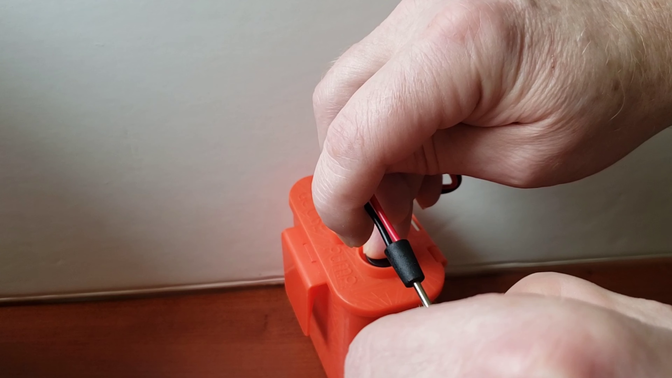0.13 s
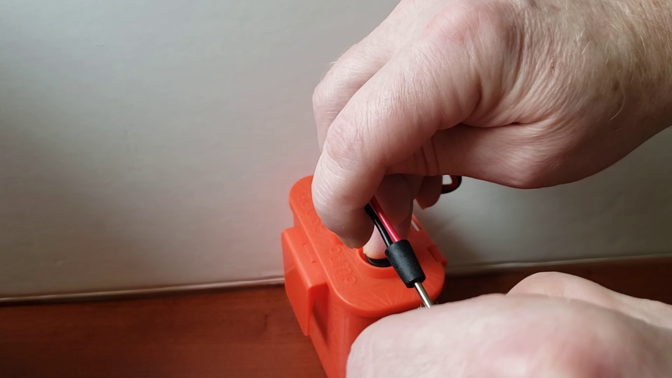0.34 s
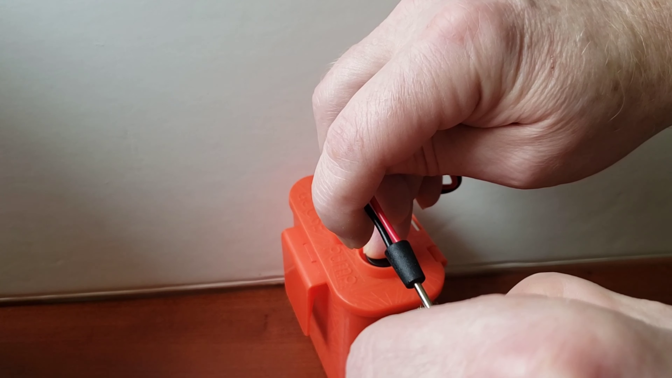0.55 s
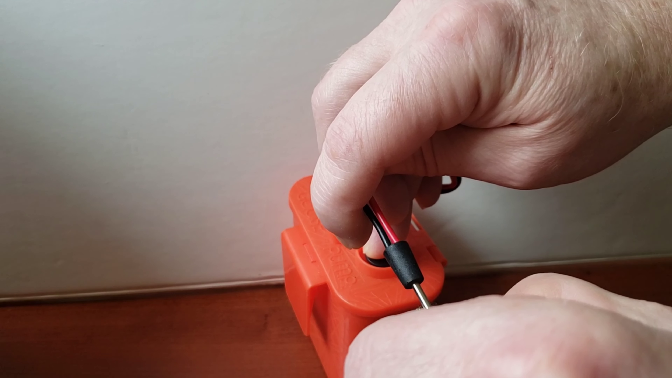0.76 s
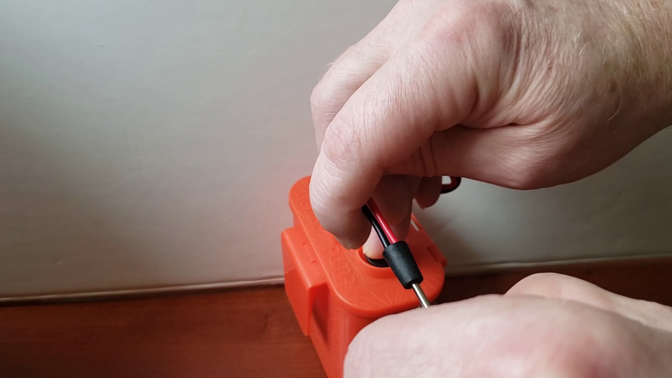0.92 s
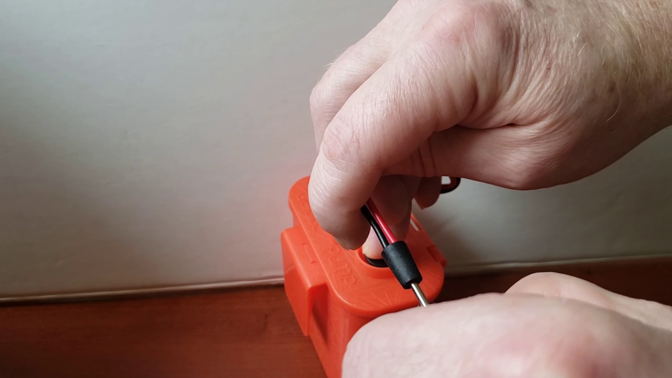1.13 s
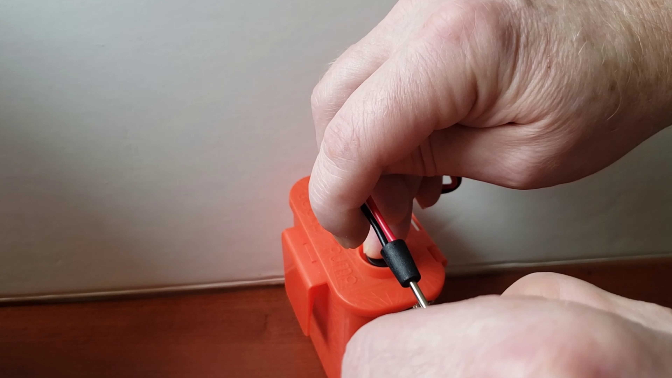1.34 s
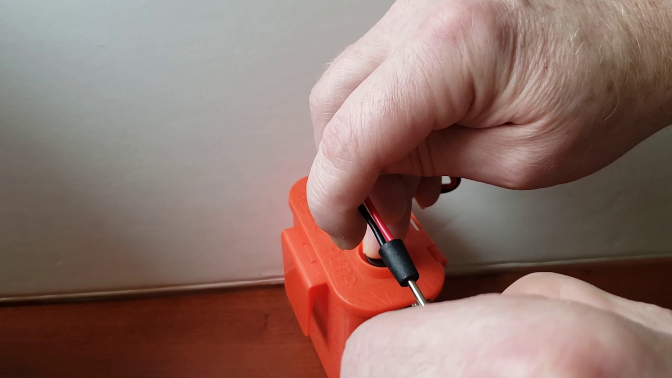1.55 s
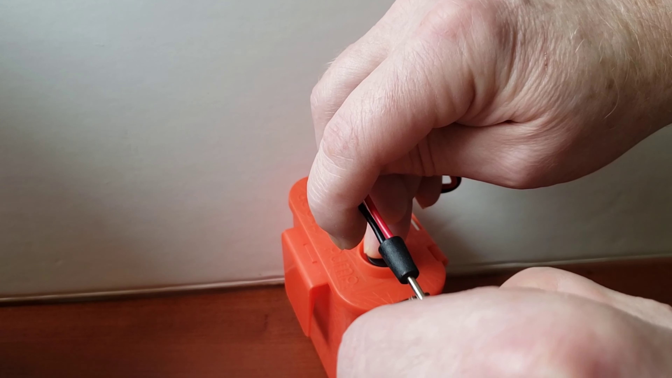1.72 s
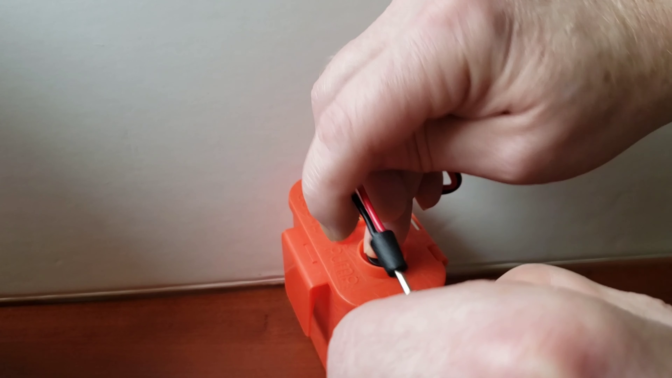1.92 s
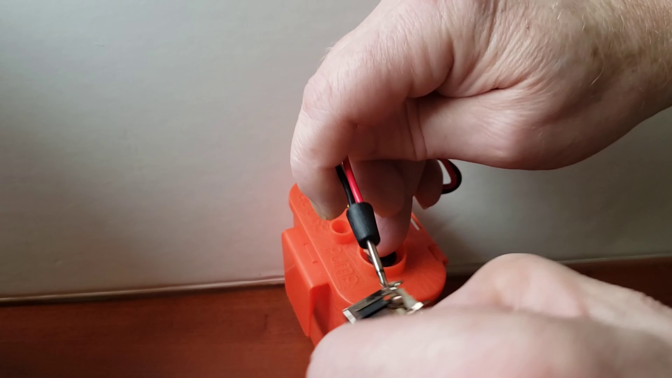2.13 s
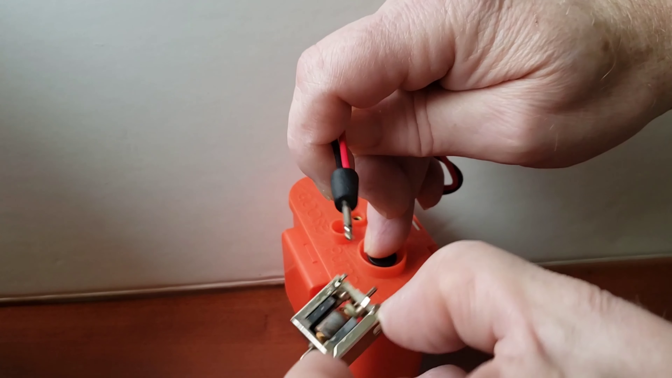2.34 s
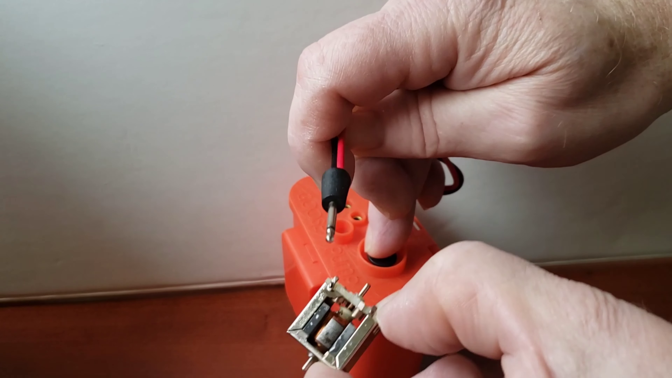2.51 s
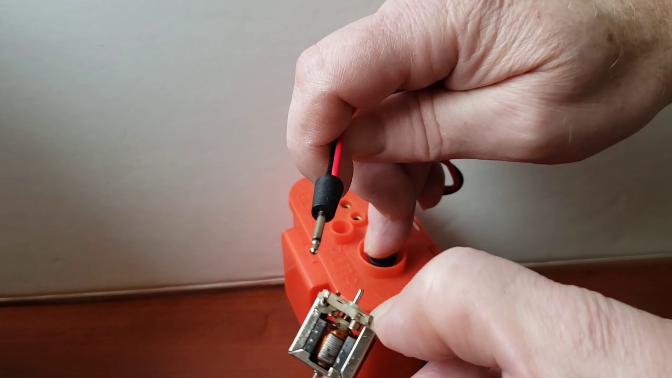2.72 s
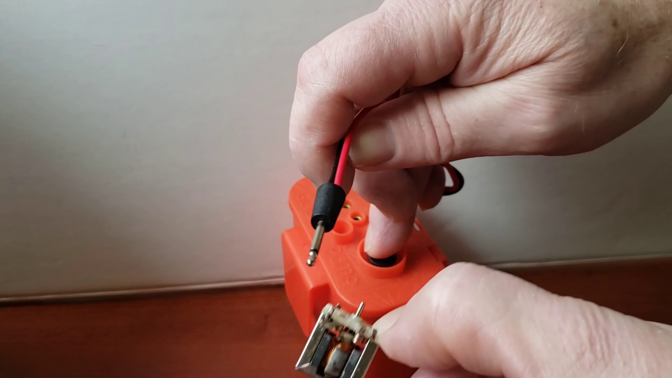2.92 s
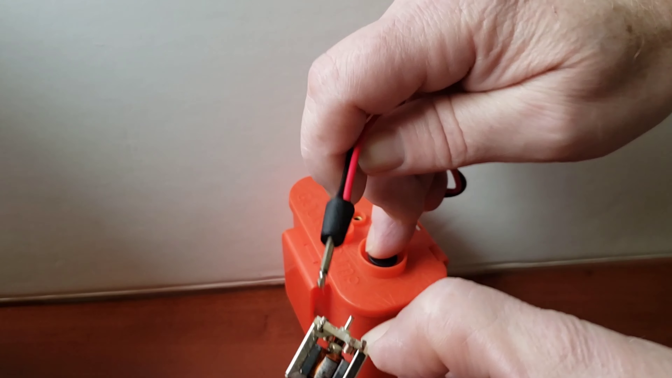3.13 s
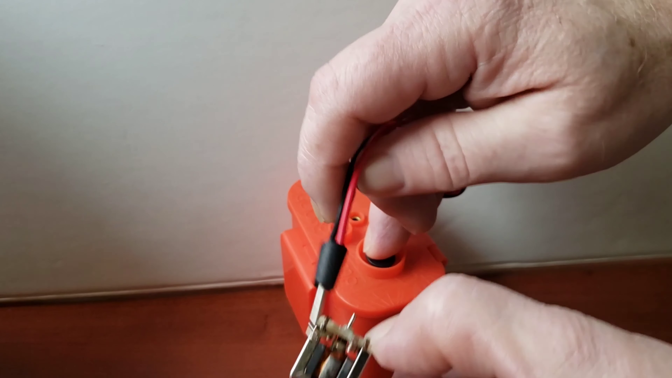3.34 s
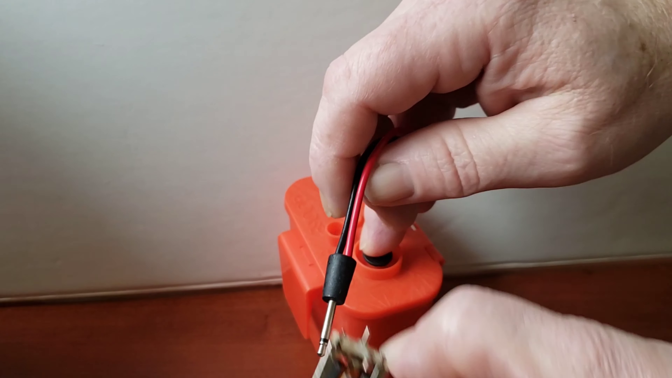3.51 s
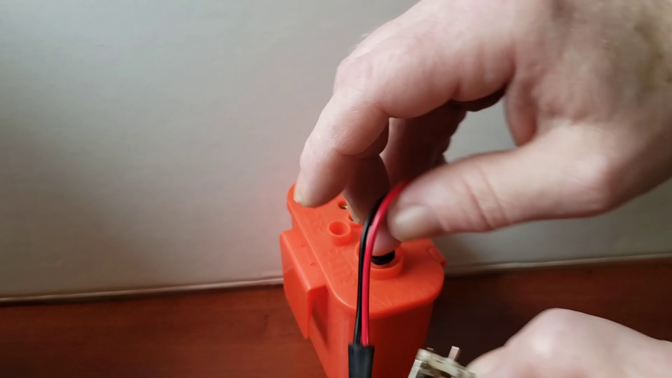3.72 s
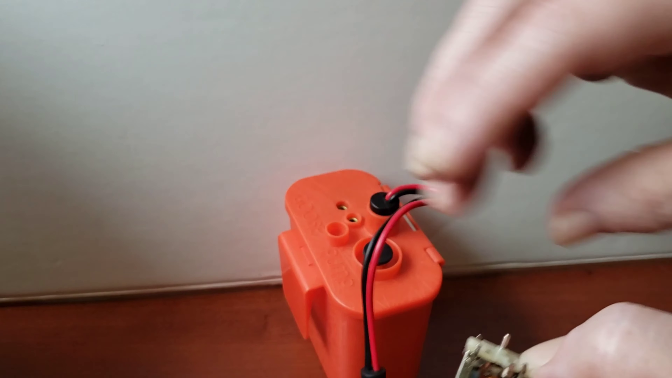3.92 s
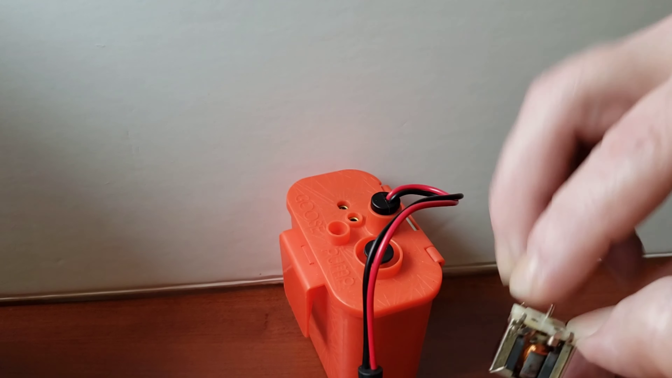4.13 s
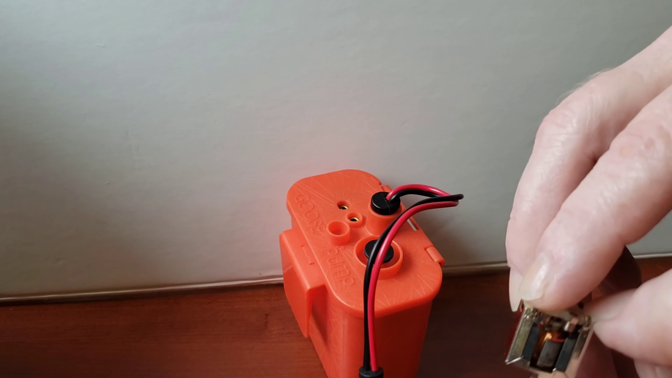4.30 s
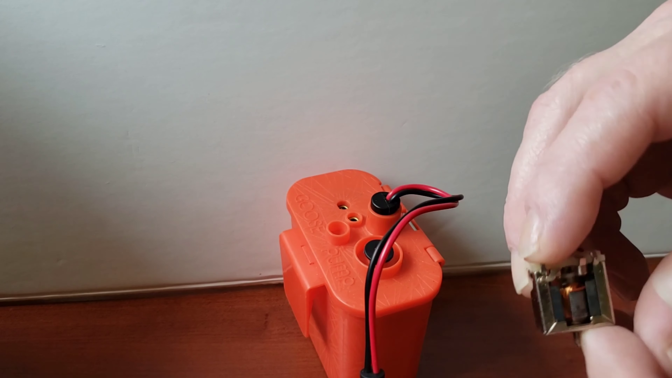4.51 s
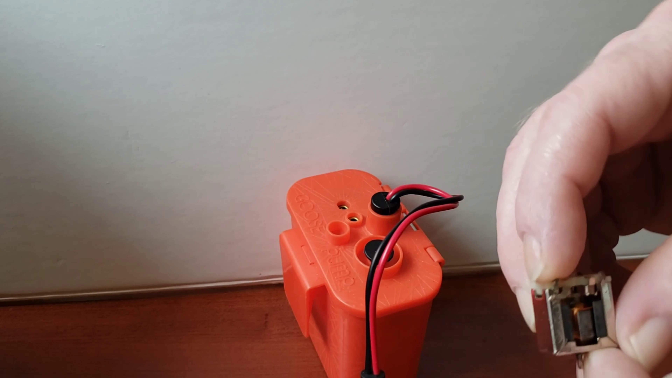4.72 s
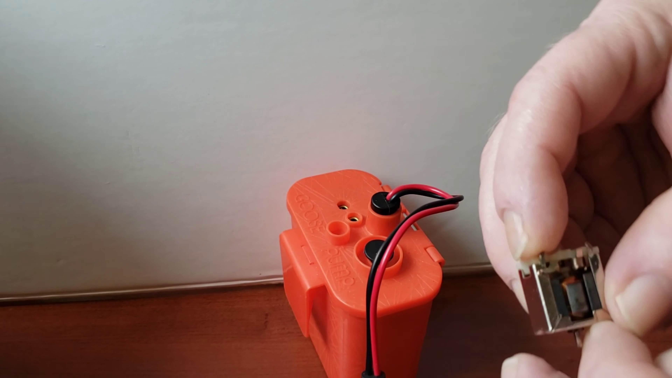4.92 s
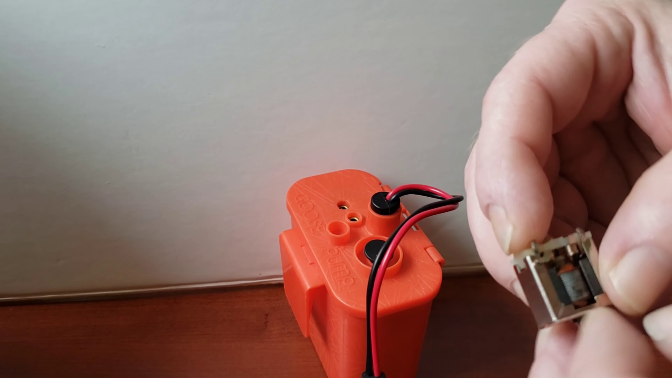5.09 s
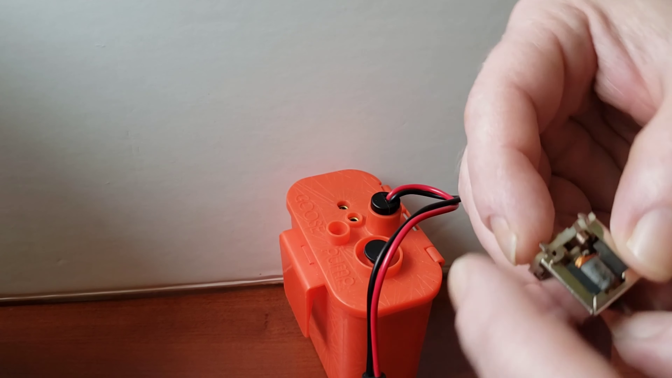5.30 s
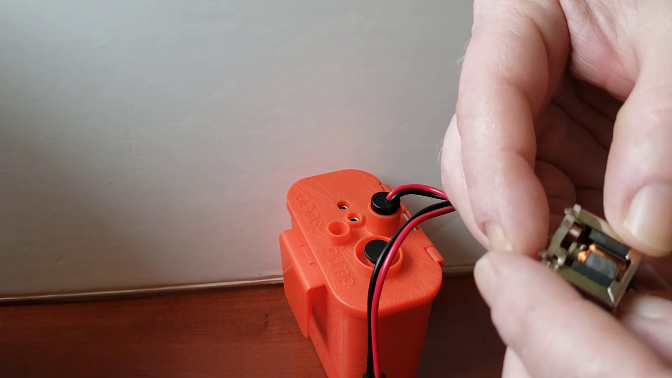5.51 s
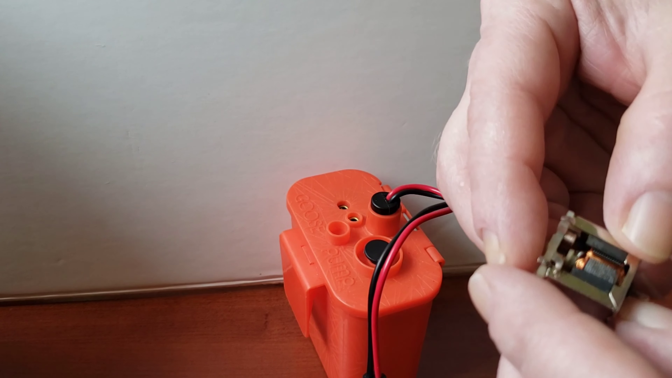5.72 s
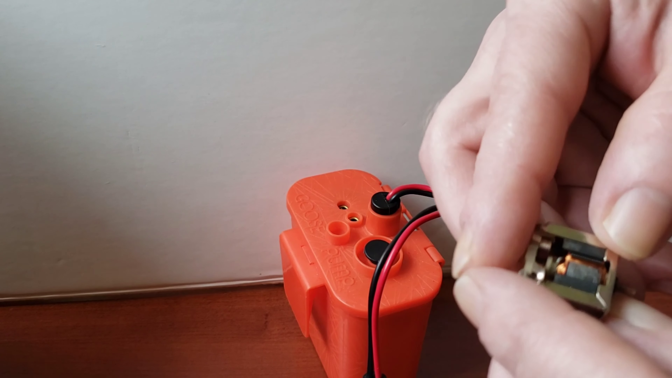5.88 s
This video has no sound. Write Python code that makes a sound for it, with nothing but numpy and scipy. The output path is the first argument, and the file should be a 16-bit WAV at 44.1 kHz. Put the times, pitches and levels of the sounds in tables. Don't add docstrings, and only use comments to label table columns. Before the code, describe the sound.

A tiny bare electric motor whines steadily for under two seconds, coasts down with scratchy brushes, then fingers knock and tick against plastic and metal.

```python
import sys
import numpy as np
from scipy import signal
from scipy.fft import rfft, irfft, next_fast_len
from scipy.io import wavfile
from scipy.ndimage import uniform_filter1d, map_coordinates

SR = 44100
rng = np.random.default_rng(int(sys.argv[2]) if len(sys.argv) > 2 else 0)


def natural_amplitude(level_db):
    exponent = np.asarray(level_db, float) / 20
    return 10 ** exponent


def to_wav(sig):
    pcm = np.clip(np.atleast_2d(sig), -1, 1) * 32767
    pcm = np.round(pcm).astype(np.int16)
    wavfile.write(sys.argv[1], SR, pcm.T)


N = 262395
TIME = np.arange(N) / SR

# (frequency [Hz], level [dB per Hz])
ROOM_RUMBLE = [(30, -81), (60, -67.5), (110, -75), (260, -69), (500, -83.5), (900, -87.5), (1150, -102),
               (1500, -99), (2200, -107), (4500, -114), (6800, -107), (8400, -121), (10500, -113),
               (15000, -111)]
# (frequency [Hz], width [Hz], level [dB])
DUCT_DRONE = (51.2, 3.3, -55.5)
# (frequency [Hz], level [dB])
SUPPLY_WHISTLES = [(9050, -90), (10870, -87)]

# (time [s], speed [turns per s])
FREE_SPEED = [
    (.3, 348),
    (.7, 347.3),
    (.87, 349.5),
    (1.15, 345.5),
    (1.37, 339.8),
    (1.5, 347.8),
    (1.7, 354),
    (1.75, 353.5),
]
# (multiple [1], level [dB])
LOW_TONES = [(1, -8), (2, -15), (3, -4), (5, -19), (6, -9.5), (7, -15)]
HIGH_TONES = [(9, 0), (10, -12), (12, -1), (13, -3), (15, -3.5), (18, -11), (20, 0.5), (21, -0.5)]
# (level at speed [dB], knee [turns per s],
# loss under the knee [dB per turn per s], fade 0.1 s after power off [dB])
TONE_FADES = [
    (-57, 335, .135, 5.5),
    (-60.5, 280, .7, 4.5),
]
# (frequency [Hz], width [Hz], level [dB])
FRAME_RINGS = [(1150, 2600, -12.5), (2490, 250, -4.5), (3586, 250, -8.5), (4370, 350, 0), (5000, 240, 0.5),
               (5470, 630, -4.5), (6880, 340, 6.5), (7430, 610, 3.5)]
CAN_RINGS = [(9975, 378, 2.5), (10200, 710, 1), (11900, 1930, -13)]
BRUSH_SPRING_RINGS = [(13300, 1400, -14), (13900, 160, -7), (14220, 130, 0), (15080, 450, -12),
                      (15400, 150, -11)]
# (frequency [Hz], width [Hz], level [dB])
DRAG_RINGS = [(6760, 320, -15), (8370, 1700, -24), (10180, 290, 0.5), (11100, 1100, -9), (14400, 410, -5.5)]
# (level at full speed [dB], power of speed [1])
SCRAPE = [
    (-47.5, 1.9),
    (-37.5, 2.1),
    (-32.5, 1.9),
]
# (time [s], level [dB])
BRUSH_PRESSURE = [(.09, -27), (.115, 2.8), (.4, 1), (.6, 0.6), (1.0, 1.2), (1.45, 0.8), (1.68, 0.8),
                  (1.9, 2.1), (2.04, 2.5), (2.16, 0.5), (2.35, 1.3), (2.44, -1.3), (2.53, -19)]

# (time [s], length [s], frequency [Hz], width [Hz], level [dB])
RUBS = [(2.326, 0.099, 870, 960, -64), (1.852, 0.31, 4760, 3040, -56), (2.3, 0.53, 6980, 1200, -70),
        (2.39, 0.39, 5180, 600, -73.5), (2.47, 0.33, 14500, 2000, -69), (3.112, 0.25, 3920, 5000, -73.5),
        (3.15, 0.25, 14600, 2500, -72), (3.491, 0.22, 2110, 1990, -72), (3.5, 0.1, 900, 1120, -57.5),
        (3.576, 0.14, 800, 1090, -60.5), (3.821, 0.094, 900, 1400, -60), (3.823, 0.11, 4500, 4000, -66),
        (4.048, 0.035, 895, 1200, -65), (4.173, 0.043, 900, 1200, -64), (4.53, 0.077, 2140, 700, -65)]
# (time [s], hold [s], low level [dB], high level [dB])
RUSTLE = [(2.5, 0.16, -69, -62), (2.93, 0.0097, -69.5, -83), (3.25, 0.0077, -64.5, -65.5),
          (3.52, 0.017, -71, -69), (3.56, 0.086, -69, -73), (3.84, .33, -69, -74), (4.2, .03, -73, -71),
          (4.65, .011, -66, -75), (5.39, .011, -69.5, -71), (5.65, .011, -68.5, -73),
          (5.95, .011, -71, -79)]
# (time [s], peak level [dB], brightness [dB per octave])
KNOCKS = [(2.333, -37, -1.5), (3.575, -26, -1), (3.791, -45.5, -8), (3.82, -26.5, -0.5), (3.832, -37.5, 2),
          (4.001, -42, -10.5), (4.04, -37, -5.5), (4.069, -40.5, -7), (4.171, -35, -1.5),
          (4.237, -43, -3.5), (4.275, -53, -12), (2.2, -48, 0)]
# (frequency [Hz], level [dB], time to fall 60 dB [s])
CASE_RINGS = [(300, -8, .05), (440, -1, .07), (560, -5, .045), (680, 0, .06), (770, -5, .05),
              (880, -4, .05), (1050, -5, .055), (1200, -8, .045), (1340, -8, .05), (1500, -12, .04)]
# (time [s], peak level
# [dB], frequency [Hz], time to fall 60 dB [s])
TICK_LIST = [(3.1249, -58, 6730, 0.033), (3.512, -41, 10700, 0.014), (3.512, -52.5, 6850, 0.032),
             (3.575, -48, 6760, 0.017), (3.5745, -51, 4280, .015), (3.8195, -49, 6600, .015),
             (3.8195, -47, 4180, 0.023), (3.859, -49, 6450, 0.03), (3.9036, -52, 6900, 0.052),
             (3.976, -57, 14400, 0.03), (4.001, -60, 6900, .015), (4.0136, -49.5, 6900, 0.028),
             (4.107, -58, 6500, 0.03), (4.172, -65, 6500, .02), (4.172, -61, 4000, .02),
             (5.3816, -60, 5400, 0.03), (5.6345, -52.5, 6600, 0.029), (5.634, -58, 4300, 0.033),
             (5.6334, -59, 9500, 0.02), (5.6334, -54, 12500, 0.02), (5.9071, -63, 6820, 0.03)]
FURTHER_TICKS = [(2.9189, -60.5, 2770, 0.035), (3.5749, -44, 1540, 0.036), (3.8193, -47, 2470, 0.013),
                 (3.8578, -51, 4000, 0.048), (3.9026, -61, 4150, 0.026), (3.976, -64, 4100, .03),
                 (4.11, -60, 4200, .03), (4.1719, -62, 2030, 0.03), (4.5184, -59, 2490, 0.05),
                 (4.541, -50, 2420, 0.05), (5.634, -58, 2650, 0.031)]

# (frequency [Hz], level [dB])
COVERED_PORT = [(300, -60), (2000, -42), (3200, -29), (4500, -26), (6500, -15), (8500, -24), (9700, -20),
                (10300, -13), (12500, -7), (15000, -9)]
# (frequency [Hz], level [dB per Hz])
RIGHT_HISS = [(30, -110), (100, -104), (500, -110), (3000, -114), (5500, -119), (8000, -125), (10000, -119),
              (12000, -113), (15500, -113)]

FULL_SPEED = 350
POWER_ON_S, SPIN_UP_S, POWER_OFF_S = .078, .1, 1.75
FRICTION, DRAG = 270, 1.1


def rms_one(x):
    return x / np.sqrt(np.mean(x ** 2) + 1e-20)


def colour(x, points):
    size = next_fast_len(N + 2048)
    hz, db = np.transpose(points)
    log_hz = np.log(np.maximum(np.arange(size // 2 + 1) * SR / size, 1))
    gain = natural_amplitude(np.interp(log_hz, np.log(hz), db))
    return irfft(rfft(x, size) * gain, size)[..., :N]


def resonance(x, hz, width_hz):
    r = np.exp(-np.pi * width_hz / SR)
    feedback = [1, -2 * r * np.cos(2 * np.pi * hz / SR), r * r]
    return signal.lfilter([(1 - r * r) / 2, 0, (r * r - 1) / 2], feedback, x)


def resonance_twice(x, hz, width_hz):
    return resonance(resonance(x, hz, width_hz), hz, width_hz)


def body(x, modes):
    total = 0
    for k, (hz, width_hz, db) in enumerate(modes):
        total = total + (-1) ** k * natural_amplitude(db) * resonance(x, hz, width_hz)
    return rms_one(total)


def drift(rate):
    knots = rng.standard_normal(4000)
    return map_coordinates(knots, [TIME * rate + 10], order=2)


def room_tone():
    hum_phase = 2 * np.pi * 59.2 * TIME + 0.2 * drift(3.71)
    hum = natural_amplitude(-41.5 + 0.05 * drift(3.1)) * np.sin(hum_phase)
    whistles = 0
    for hz, db in SUPPLY_WHISTLES:
        whistles = whistles + natural_amplitude(db + 2 * drift(1.5)) * np.sin(2 * np.pi * hz * TIME + drift(9))
    hz, width_hz, db = DUCT_DRONE
    drone = natural_amplitude(db) * rms_one(resonance_twice(rng.standard_normal(2 * N), hz, width_hz)[N:])
    rumble = np.sqrt(SR / 2) * colour(rng.standard_normal(N), ROOM_RUMBLE)
    return hum + drone + whistles + rumble


def rotor_speed():
    climb = 1 - np.exp(-np.clip(TIME - POWER_ON_S, 0, None) / SPIN_UP_S)
    powered = np.interp(TIME, *np.transpose(FREE_SPEED)) * climb
    kept = np.exp(-DRAG * np.clip(TIME - POWER_OFF_S, 0, None))
    return np.clip(powered * kept - FRICTION / DRAG * (1 - kept), 0, None)


def whine(speed, turn):
    coast = np.clip(TIME - POWER_OFF_S, 0, None) * 10
    slack_db = .25 * np.clip(FULL_SPEED - speed, 0, None)
    tones = 0
    for group, (full_db, knee, loss, fade_db) in zip((LOW_TONES, HIGH_TONES), TONE_FADES):
        below_knee = np.clip(knee - speed, 0, None) * (coast == 0)
        level_db = full_db - loss * below_knee - fade_db * coast ** 2
        for multiple, db in group:
            waver_db = (2.0 + 1.3 * (multiple > 8)) * drift(60.1)
            tone_db = level_db + db + 11 - slack_db * (multiple > 9) + waver_db
            tones = tones + natural_amplitude(tone_db) * np.sin(multiple * turn + rng.uniform(0, 2 * np.pi))
    return tones


def bench_echoes(x, count=14, span_s=.006, echo_db=-22.0):
    taps = np.zeros((2, int(span_s * SR) + 2))
    lags = rng.random((2, count))
    for side in (0, 1):
        places = 1 + (lags[side] * span_s * SR).astype(int)
        taps[side, places] = natural_amplitude(echo_db - 4.5 * lags[side]) * rng.choice([-1, 1], count)
    taps[0, 0] = taps[1, 5] = 1
    return signal.oaconvolve(x, taps, axes=1)[:, :N]


def brush_scrape(speed, turn):
    depth = .25 + .5 * np.clip(1 - speed / 220.0, 0, 1) ** 2
    throb = np.exp(depth * (np.cos(turn) + 0.1 * np.cos(2 * turn + 1) + 0.16 * np.cos(3 * turn + 2)))
    near, other = rng.standard_normal((2, N))
    alike = .6
    far = alike * near + np.sqrt(1 - alike ** 2) * other
    friction = np.array([near, far]) * throb / np.sqrt(uniform_filter1d(throb ** 2, size=2000))
    friction = bench_echoes(friction)

    s, db = np.transpose(BRUSH_PRESSURE)
    pressure_db = np.interp(TIME, s, db, -90, -90)
    slowed_db = 20 * np.log10(speed / FULL_SPEED + 1e-3)
    levels = [pressure_db + db + power * slowed_db for db, power in SCRAPE]
    levels.append(pressure_db - 54)
    out = 0
    for modes, level_db in zip((FRAME_RINGS, CAN_RINGS, BRUSH_SPRING_RINGS, DRAG_RINGS), levels):
        out = out + natural_amplitude(level_db + 4.0 + 1.2 * drift(29.63)) * body(friction, modes)
    return out


def motor():
    speed = rotor_speed()
    turn = 2 * np.pi * np.cumsum(speed * (1 + 0.00212 * drift(59.46))) / SR
    return whine(speed, turn) + brush_scrape(speed, turn)


def rustle_levels():
    s, held, *levels = np.transpose(RUSTLE)[..., None]
    t = np.arange(0, N, 64) / SR
    rise_db = 112 * np.clip(s - t, 0, None)
    fall_db = 109 * np.clip(t - s - held, 0, None)
    away_db = rise_db + fall_db
    away_db[0, t < s[0] - .04] = 200
    return [np.interp(TIME, t, (db - away_db).max(axis=0)) for db in levels]


def hands():
    grainy = rng.standard_normal((2, N)) * natural_amplitude(2.5 * drift(300))
    low_db, high_db = rustle_levels()
    low = natural_amplitude(low_db - 1.5) * body(grainy, [(6610, 440, 0)])
    airy = resonance(grainy, 11600, 4400)
    high = natural_amplitude(high_db + 1) * body(airy, [(11550, 3300, -3), (14000, 1500, -3.5)])
    out = low + high
    for s, length, hz, width_hz, db in RUBS:
        span = slice(int(s * SR), int((s + length) * SR))
        rub = resonance_twice(grainy[:, span], hz, width_hz)
        u = np.linspace(0, 1, rub.shape[1])
        swell = np.sqrt(np.sin(np.pi * u ** 0.4).clip(0))
        out[:, span] += natural_amplitude(db + 3.0) * swell * rms_one(rub)
    return out


def knocks():
    s, peak_db, bright_db = np.transpose(KNOCKS)
    scatter_db = rng.normal(0, 2.5, (len(s), len(CASE_RINGS)))
    late = rng.uniform(0, .0007, scatter_db.shape)
    out = np.zeros(N)
    for k, (hz, db, t60) in enumerate(CASE_RINGS):
        clicks = np.full(N, 1e-18)
        hit_db = peak_db + db - 4.5 + bright_db * np.log2(hz / 700) + scatter_db[:, k]
        clicks[((s + .0005 + late[:, k]) * SR).astype(int)] = -natural_amplitude(hit_db)
        r, w = natural_amplitude(-60 / (t60 * SR)), 2 * np.pi * hz / SR
        out += signal.lfilter([0, np.sin(w)], [1, -2 * r * np.cos(w), r * r], clicks)
    out = signal.sosfilt(signal.butter(3, [250, 1800], "band", fs=SR, output="sos"), out)
    t = np.arange(12000) / SR
    wash = rng.standard_normal(len(t)) * natural_amplitude(-33 - 60 * t / .2) * np.clip(t / 0.022, 0, 1)
    return out + signal.oaconvolve(out, wash)[:N]


def ticks():
    length = 4000
    out, t = np.zeros(N + length), np.arange(length) / SR
    for rows, width_hz in ((TICK_LIST, 840), (FURTHER_TICKS, 900)):
        for s, db, hz, t60 in rows:
            burst = rms_one(resonance_twice(rng.standard_normal(length), hz, width_hz))
            start = int(s * SR)
            out[start:start + length] += burst * natural_amplitude(db - 3 - 60 * t / t60)
    return out[:N]


def scene():
    room = room_tone()
    left, right = motor() + hands() + knocks() + ticks()
    return np.array([left + room, colour(right, COVERED_PORT)])


def low_pass(x):
    return signal.sosfilt(signal.butter(12, 16410, fs=SR, output="sos"), x)


def record(dry):
    hiss = np.sqrt(SR / 2) * colour(rng.standard_normal(N), RIGHT_HISS)
    top_cut = signal.ellip(12, .5, 70, 15520, fs=SR, output="sos")
    mix = signal.sosfilt(top_cut, dry + np.array([np.zeros(N), hiss]))
    return low_pass(mix)


dry = scene()
out = record(dry)
to_wav(out)
```